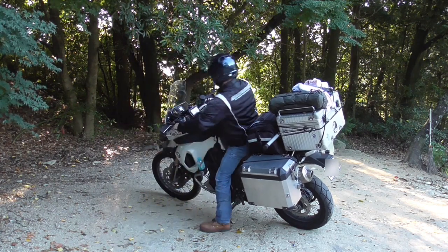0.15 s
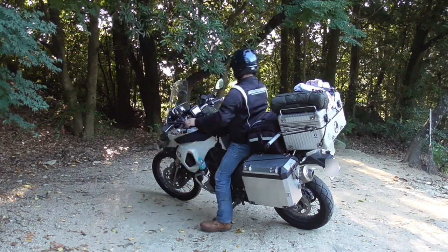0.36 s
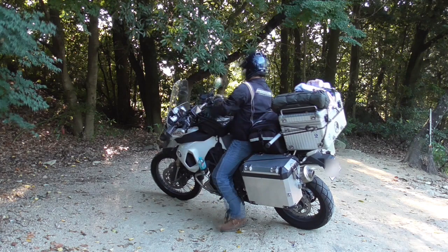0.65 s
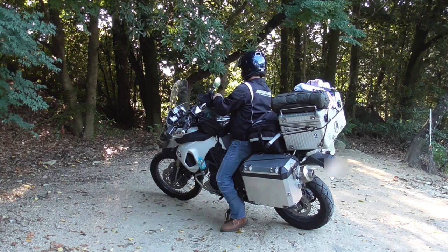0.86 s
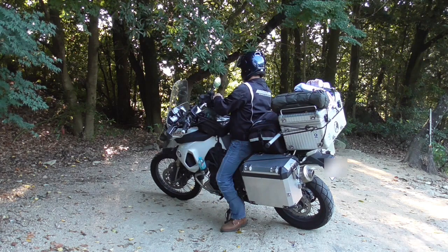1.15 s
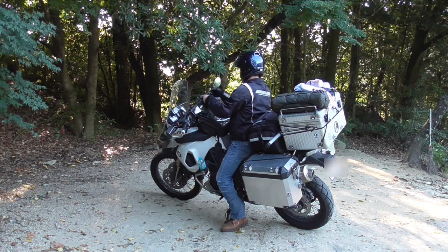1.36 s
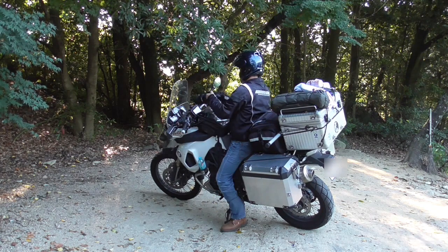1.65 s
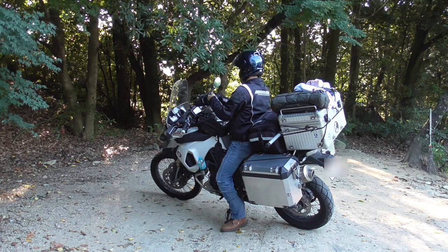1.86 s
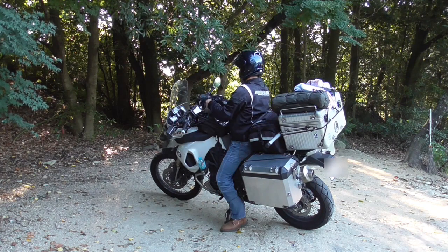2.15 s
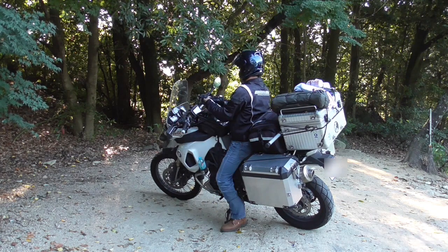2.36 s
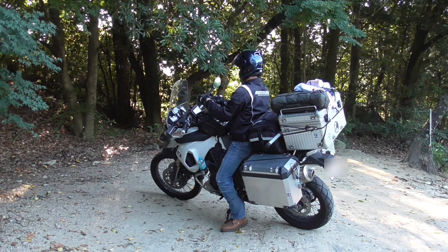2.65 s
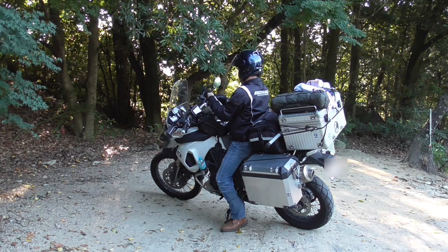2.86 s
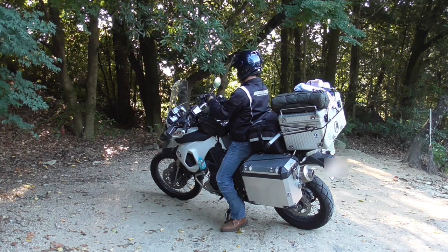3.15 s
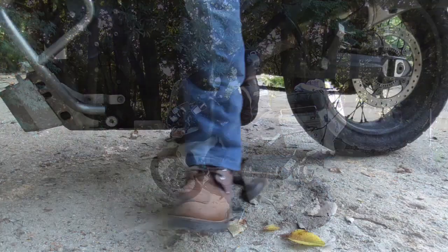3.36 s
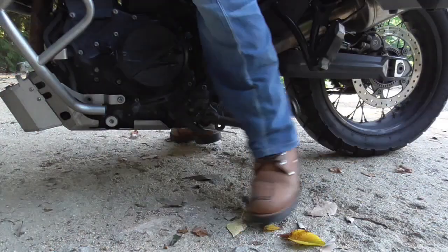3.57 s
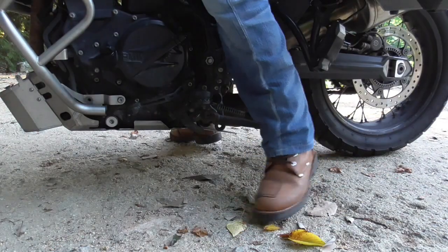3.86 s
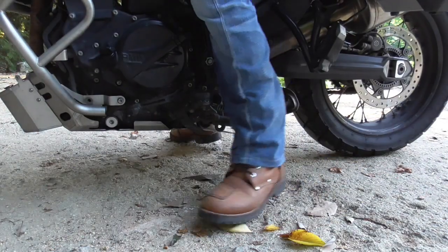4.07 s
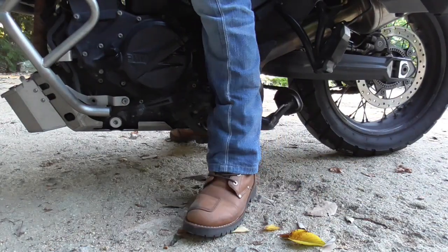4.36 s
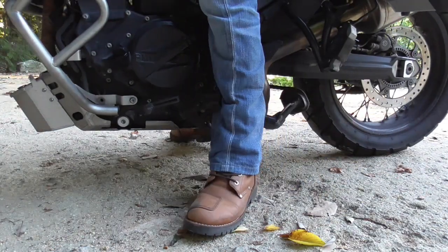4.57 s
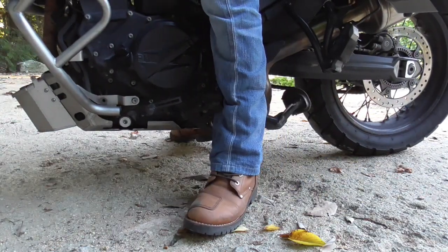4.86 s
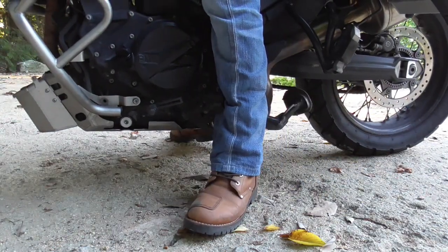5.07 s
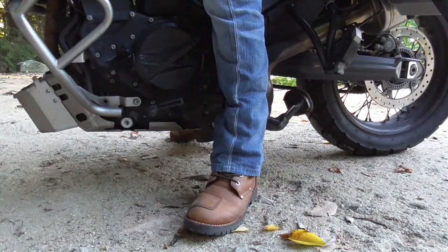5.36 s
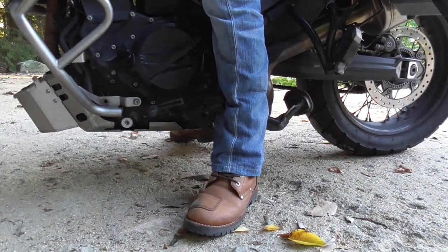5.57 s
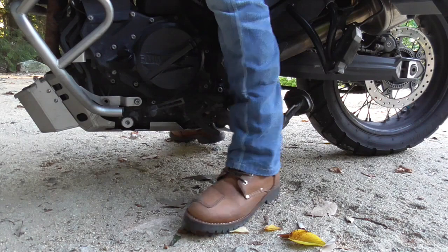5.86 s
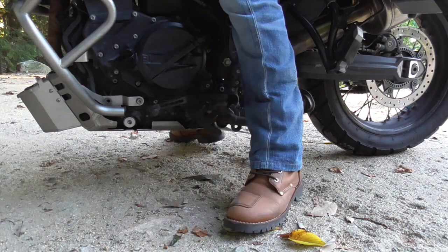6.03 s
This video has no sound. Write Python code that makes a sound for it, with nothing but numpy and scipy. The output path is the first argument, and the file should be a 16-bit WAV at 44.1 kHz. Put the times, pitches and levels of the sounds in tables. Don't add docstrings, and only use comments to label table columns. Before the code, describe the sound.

A wood outdoors, recorded in stereo near a motorcycle. From 0 s a dense, bright cicada chorus buzzes, throbbing almost five times a second, dipping briefly around 0.4 s; a soft boot shuffle, small close chirps and tiny dry rustles sit over faint leaves and distant traffic. At 3.07 s the sound drops out for an instant, then a scrape and crackle lead to a hard metal knock at 3.29 s, a second at 3.35 s, with a dull thud, rattle and thin spring ring. Cicadas swell back; a gritty scuff runs 3.8-4.1 s. At 4.56 s the starter clunks and grinds, its gear whine rising and sagging over three compressions, with low puffs. At 5.04 s the twin engine catches: uneven, dry, thumping barks with metallic chain clatter and short tree echoes, cicadas ducked beneath. From 5.6 s it revs faster, slackens near 5.85 s, then flares again around 6 s until the end.

```python
import sys
import numpy as np
from scipy import signal
from scipy.fft import rfft, irfft, next_fast_len
from scipy.io import wavfile

SR = 44100
rng = np.random.default_rng(int(sys.argv[2]) if len(sys.argv) > 2 else 0)


def voltage_ratio(level):
    return 10 ** (np.asarray(level, float) / 20)


def file_out(sig):
    cols = np.atleast_2d(sig).T
    lim = np.clip(cols, -1, 1)
    pcm = np.round(lim * 32767).astype(np.int16)
    wavfile.write(sys.argv[1], SR, pcm)


N = 273420

# (first firing [s], firings [count], first gap [ms], last gap [ms])
FIRING_RUNS = [
    (5.0436, 4, 37.6, 30.1),
    (5.1757, 12, 34.7, 35.5),
    (5.6219, 5, 28.4, 19.4),
    (5.7464, 4, 19.6, 21.2),
    (5.8259, 3, 22.1, 30.9),
    (5.9059, 3, 25.8, 28.5),
    (5.9907, 3, 26.3, 23.9),
    (6.0613, 4, 19.0, 18.5),
    (6.1382, 3, 26.1, 20.1),
]
# (time [s], bark [dB], thump [dB])
ENGINE_LOAD = [(5.045, -20.5, -16.5), (5.082, -9.5, -9), (5.16, -8.5, -12), (5.3, -11, -11.5),
               (5.375, -4.5, -8), (5.44, -9.5, -14), (5.49, -7, -3.5), (5.54, -12.5, -20.5),
               (5.665, -5, -19.5), (5.72, -15, -18), (5.765, -26, -20), (5.81, -22, -19.5),
               (5.88, -33, -25), (5.96, -17, -26), (5.99, -4, -7.5), (6.062, -13.5, -17),
               (6.118, -14.5, -19.5), (6.17, -29, -16)]
# (time [s], bark change [dB], thump change [dB], echo change
# [dB])
UNEVEN_FIRINGS = [(5.044, 6.5, 2.5, -7), (5.115, -4, -17, -12), (5.145, -1.5, 0, -8), (5.21, -6, -8, 12),
                  (5.245, 2, 0, -0.5), (5.315, 0.5, -1, -1), (5.35, -0.5, 0.5, 7), (5.42, -3, 1, 8),
                  (5.456, 1, -2, -6), (5.491, 0, -4.5, -7), (5.526, 0.5, 1, -1), (5.562, -0.5, 10.5, -8),
                  (5.622, 1, 8.5, -1), (5.65, 1, 5, -15), (5.676, 3.5, -7, -2), (5.698, -3, 7.5, 14),
                  (5.719, 4.5, 2, -18), (5.746, -3, -3, -15), (5.766, -1.5, -11, 12), (5.786, -1, 9, -14),
                  (5.808, -4, 5, 3), (5.826, 18, 15, -5), (5.849, 14, -13, -3.5), (5.879, -5, 4, 0),
                  (5.906, 0, 6, -17), (5.932, 2, 11, -6), (5.961, -8, 2, -9), (6.017, 3.5, -2, 0),
                  (6.041, 3, 4, -12), (6.062, 8, 7, -13), (6.08, 8.5, 2, -16), (6.099, 1.5, 2, -12),
                  (6.118, 10, 2, 5), (6.138, -7, -3, -7), (6.164, -7, 3, 1), (6.184, 9, 3, 2)]
# (time [s], delay [ms])
LATE_FIRINGS = [(5.044, 0.87), (5.115, 0.64), (5.176, 1), (5.315, 0.43), (5.456, 0.29), (5.526, 0.33),
                (5.622, 0.54), (5.65, 0.94), (5.826, .2), (5.786, -1.8), (5.719, 0.83), (5.961, -0.46),
                (6.062, .4)]
# (time [s], bark [dB], thump [dB], echo [dB])
EXTRA_POPS = [(5.0583, -10, -19, -1.5), (5.0932, -12, -19, 6), (5.1256, -8.5, -13, 5), (5.2398, -15, -15, -9),
              (5.298, -18, -24, 3), (5.366, -16, -31, -2), (5.438, -17, -26, 1), (5.5999, -16, -25, 11),
              (5.7272, -11, -24, 4), (5.7314, -12, -30, -9), (5.7745, -16, -22, 8), (5.838, -18, -30, 12),
              (5.897, -36, -18, -9), (5.941, -33, -16, -9), (5.9508, -23.5, -32, 24), (5.971, -8, -26, -5)]
# (time [s], pitch ratio [1])
COOLING_PITCH = [(5.73, 0.93), (5.79, 0.76), (5.83, 0.89), (5.9, 0.82), (5.96, 0.87), (6.13, 0.96),
                 (6.19, 0.73)]
# (pitch [Hz], level [dB], time to die by 60 dB [s])
SILENCER_MODES = [(426.4, -24.5, 0.34), (480, -31, 0.061), (706, -16, 0.087), (985, -31, 0.026)]
# (pitch [Hz], level [dB], time to die by 60 dB [s])
THUMP_MODES = [(118, -2, 0.074), (168, 3, 0.068)]
# (pitch [Hz], width [Hz], level [dB])
PIPE_FLOW = [(123, 100, -38), (408, 57, -38)]
# (time [s], rise [s], hold [s], fall [s], level [dB])
REV_FLARES = [
    (5.074, 0.022, .002, 0.025, 5),
    (5.64, 0.036, 0.13, 0.016, 4),
    (5.91, 0.053, 0.06, 0.017, 2),
    (5.996, 0.0046, 0.017, 0.2, 5.5),
    (6.134, .008, 0.016, 0.054, 4),
]
# (pitch [Hz], level [dB per Hz])
CHAIN_COLOUR = [(350, -3), (600, -4.5), (651, -2), (706, -5), (953, -5.5), (2240, -15), (3520, -9.5),
                (4490, -16), (7430, -20), (10300, -15.5), (15500, -26.5)]
# (time [s], level [dB])
STARTER_GRIND = [(4.54, -60), (4.562, -36), (4.605, -29), (4.64, -36), (4.7, -47), (4.722, -51),
                 (4.76, -41), (4.786, -38.5), (4.836, -39.5), (4.851, -40), (4.875, -39), (4.9, -45),
                 (4.966, -41), (4.978, -40), (5.01, -46), (5.03, -58)]
# (pitch [Hz], level [dB per Hz])
STARTER_COLOUR = [(120, -8), (250, 3.5), (500, -0.5), (900, 6.5), (1600, -1.5), (3500, 2.5), (8000, -7),
                  (15000, -15)]
# (time [s], tooth rate [Hz], first order [dB], second order [dB], upper orders [dB])
GEAR_WHINE = [
    [(4.6, 699, -43, -33, -56), (4.618, 786, -54, -33, -52), (4.64, 1040, -35, -34, -45),
     (4.668, 1153, -32.5, -40, -39), (4.686, 1134, -28.5, -32, -38.5), (4.7, 1083, -30, -28, -39),
     (4.718, 841, -36, -45, -39), (4.742, 654, -32.5, -36, -46), (4.755, 616, -50, -48, -60)],
    [(4.84, 1222, -49, -52, -54), (4.856, 1278, -24.5, -37, -46), (4.868, 1197, -38, -40, -41),
     (4.885, 1110, -48, -50, -47)],
    [(4.968, 1496, -46, -59, -59), (4.982, 1460, -26, -36, -42), (4.995, 1250, -36, -33, -59),
     (5.01, 1132, -25, -40, -36.5), (5.022, 1120, -44, -47, -56)],
]
# (multiple [1], level [dB])
GEAR_ORDERS = [(2, 1.2), (3, -1), (4, 4), (5, -2), (6, 2), (7, -15), (8, -1), (9, -3)]
# (time [s], peak [dB], pitch [Hz], crack [dB])
STARTER_CLUNKS = [
    (4.561, -21.5, 1030, -41),
    (4.603, -11.5, 1480, -16),
    (4.719, -10.5, 1550, -38),
    (4.845, -12, 1276, -10),
    (4.849, -21, 1150, -17),
    (4.867, -18, 1250, -23),
    (4.934, -28, 985, -19),
    (4.974, -12, 1510, -9.5),
    (5.005, -25, 1130, -21),
    (5.097, -34, 1400, -33),
]
# (time [s], peak [dB], pitch [Hz])
COMPRESSION_PUFFS = [
    (4.598, -55, 137),
    (4.799, -33.5, 72.7),
    (4.928, -34, 70.5),
    (4.948, -47, 99.6),
]
# (time [s], peak [dB], crack [dB], crack time to die [s], damping [0-1])
STAND_KNOCKS = [
    (3.287, -11, -9.5, 0.013, 0.8),
    (3.292, -14, -19, 0.031, 0.17),
    (3.348, -23, -26, 0.041, 0.4),
    (3.354, -15.5, -19, 0.038, 0.5),
]
# (pitch [Hz], level [dB], time to die by 60 dB [s])
FRAME_MODES = [(192, -26, .15), (229, -15, 0.14), (270, -14, 0.41), (313, -16, 0.09), (438, 1.5, 0.06),
               (613, -2, 0.015), (840, -11, 0.045), (917, 3.5, 0.045), (1120, -3, 0.072), (1227, -4, 0.077),
               (1305, -9.5, 0.055), (1040, 3, .04), (530, -7, 0.043), (700, -9, .04)]
# (pitch [Hz], peak [dB], time to die by 60 dB [s])
SPRING_MODES = [(345, -44, 2.2), (355, -52, 1.2), (720, -53, 1.3), (725.5, -58, 1.1)]
# (pitch [Hz], level [dB], time to die by 60 dB [s])
SHAKE_MODES = [(206, -7, 0.11), (274, 2, 0.05), (344, -1, 0.05), (476, 0.5, 0.017), (710, 1, 0.026),
               (890, -8, 0.017), (1150, -9, 0.02)]
# (time [s], peak [dB], pitch [Hz], time to die by 60 dB [s])
TYRE_THUDS = [
    (3.293, -21.5, 192, 0.16),
    (3.3567, -17.5, 206, 0.09),
    (3.376, -38, 207, 0.42),
    (3.42, -34, 255, 0.24),
    (3.468, -35.5, 340, 0.18),
]
# (time [s], length [s], level [dB], bright share [1])
BOOT_SCUFFS = [
    (0.04, 0.34, -50.5, .1),
    (3.159, 0.09, -49.5, 2.2),
    (3.25, 0.049, -48, 2.9),
    (3.818, 0.32, -50, 0.9),
    (4.36, 0.1, -53.5, 0.2),
]
# (time [s], length [s], lowest pitch [Hz], level [dB])
LEAF_RUSTLES = [(1.07, 0.054, 11000, -56), (1.3, .03, 11000, -51), (3.1, .17, 10500, -48),
                (3.199, 0.013, 4000, -29.5), (3.76, 0.15, 10500, -53), (3.911, .014, 10000, -42),
                (3.96, 0.089, 14300, -59)]
# (time [s], length [s], pitch [Hz], level [dB])
INSECT_CHIRPS = [(0.016, 0.043, 8330, -26.5), (0.034, 0.083, 4770, -40), (0.203, .13, 4800, -36),
                 (0.197, 0.19, 8650, -31.5), (.41, 0.06, 4850, -36), (1.153, .06, 4530, -33),
                 (2.47, 0.059, 3270, -36.5), (3.47, 0.033, 3380, -43), (3.558, .07, 4900, -32.5),
                 (3.777, .08, 4840, -35), (3.93, .05, 4800, -37), (4.01, 0.054, 4870, -37),
                 (4.18, .09, 5000, -35), (4.385, 0.075, 4900, -32), (4.4, .08, 8600, -33)]
# (pitch [Hz], level [dB per Hz])
INSECT_COLOUR = [(880, -62), (1500, -27.5), (1820, -28.5), (2150, -11), (2860, -8.5), (3340, -2),
                 (3610, -4.5), (4350, -0.5), (4990, 0.5), (5830, -8.5), (7820, 0), (9230, 0), (9790, -3),
                 (14200, -28.5), (15500, -38)]
# (pitch [Hz], side minus mid [dB])
INSECT_WIDTH = [(60, -6), (110, -8), (200, -7), (380, -6), (700, -5), (1290, -18), (2380, -4), (4400, -8),
                (8120, 1), (15000, -0.5)]
# (time [s], effort [dB], depth of the lead singer's throb [dB])
CHORUS_SONG = [(0, -31, -1.5), (.3, -33, 0), (.375, -37.5, -1), (.44, -31, 0), (.8, -31.5, -0.5),
               (1.2, -31.5, -1), (1.6, -31.5, -0.5), (2.1, -32.5, 2.5), (2.5, -33, 2.5), (2.92, -32, 1),
               (3.0, -34.5, -3), (3.25, -32.5, -3), (3.7, -30.5, -2), (4.1, -30, 1), (4.15, -36, -5),
               (4.22, -31, -1), (4.45, -30.5, 0), (6.2, -29.5, -2.5)]
# (time of a throb crest [s], throb rate [per s], end [s])
SONG_PHRASES = [
    (0.04, 4.6, .38),
    (0.89, 4.765, 3.3),
    (3.82, 4.9, 6.3),
]
# (time [s], level [dB])
LEAD_NEARNESS = [(.33, 1), (.42, 0.5), (1.6, 0.5), (1.9, -0.5), (2.7, -3.5), (3.0, 2.5)]
# (time [s], share [0-1])
SECOND_SHARE = [(.45, 0), (.55, .6), (1.1, .7), (1.4, 1), (2.95, 1), (3.05, 0)]
THROB_LAGS = [.105, .02, .016, 0]
BAND_DUCK_SHARES = [1, 1.16, 1.25, 0.6]
LATER_TILT = [-3, -3, -3, -4, -2.9, -2.5, -2.5, 1, -1.5, -4, -2]
# (time [s], depth [dB], hold [s])
GAIN_DIPS = [
    (3.301, 16, 0.0034),
    (3.364, 4, 0.11),
    (4.572, 1, .1),
    (4.67, 5.5, 0.12),
    (4.86, 7.5, 0.033),
    (4.999, 7, 2),
]
# (pitch [Hz], level [dB per Hz])
WOOD_TONE = [(12, -49), (20, -6), (125, 3), (158, -2.5), (279, 2), (340, -3.5), (544, -4.5), (1080, -11),
             (1700, -11), (2200, -10), (2860, -39), (4840, -120)]
# (pitch [Hz], side minus mid [dB])
WOOD_WIDTH = [(60, -4), (110, -9), (200, -8.5), (380, -5.5), (700, -5), (1290, -4), (2380, 1), (4400, -7),
              (8120, 0), (15000, -1)]
# (time [s], rise [s], hold [s], fall [s], level [dB])
TRAFFIC_SWELLS = [
    (2.98, 0.15, 0.22, .1, 22.5),
    (3.6, 0.059, 0.21, 1, 23),
]
# (delay [s], left [dB], right [dB])
TREE_ECHOES = [(.013, -20.5, -52), (0.028, -15.5, -15.5), (.047, -20.5, -17), (.071, -23, -51)]


def exhaust():
    out, pulses = np.zeros(N), np.zeros(N)
    size, lead_s = 6000, 0.008
    throttle_opens_s, pipe_echo_s = 5.61, 0.00964
    tail = ring_modes(soft_click(0.0013, size), SILENCER_MODES)
    barks = firings()
    warmth = 1 + 0.012 * rng.standard_normal((len(barks), 3))
    for (s, bark_db, thump_db, echo_db, long_pipe), (blast_tune, echo_tune, thump_tune) in zip(barks, warmth):
        if s > throttle_opens_s:
            blast_hz, blast_t60, thump_lag_s, chambers = 480, 0.0095, 0.0005, 2
        elif long_pipe:
            blast_hz, blast_t60, thump_lag_s, chambers = 445, 0.012, 0.0009, 3
        else:
            blast_hz, blast_t60, thump_lag_s, chambers = 495, 0.014, 0.0017, 2
        blast = -wavelet(blast_tune * blast_hz, blast_t60, size, chambers) - tail
        blast = peak_at(blast, lead_s)
        echo = peak_at(wavelet(echo_tune * 407, 0.027, size), lead_s + pipe_echo_s)
        pitch = thump_tune * np.interp(s, *np.transpose(COOLING_PITCH))
        thump = ring_modes(soft_click(0.0051, size), THUMP_MODES, pitch)
        thump = peak_at(thump, lead_s + thump_lag_s)
        bark = voltage_ratio(bark_db - 4) * (blast + voltage_ratio(echo_db - 10) * echo)
        add(out, bark + voltage_ratio(thump_db - 6) * thump, s - lead_s)
        add(pulses, voltage_ratio(bark_db + 10) * voltage_ratio(-60 * np.arange(size) / SR / 0.074), s - 0.001)
    running, = in_time([(5.015, 0), (5.04, 1)])
    flow = np.zeros(N)
    for hz, width_hz, db in PIPE_FLOW:
        flow += voltage_ratio(db) * rms_one(ring(rng.standard_normal(N), hz, 2 / width_hz))
    gas = signal.lfilter(*signal.iirnotch(280, 4, SR), out + running * flow)
    return high_pass(gas, 55), pulses


def firings():
    runs = []
    for start, count, first_ms, last_ms in FIRING_RUNS:
        gaps_ms = np.linspace(first_ms, last_ms, count - 1)
        runs.append(start + np.cumsum(np.r_[0, gaps_ms]) / 1000)
    s = np.concatenate(runs)
    long_pipe = np.arange(len(s)) % 2 == 0
    load_s, *load = np.transpose(ENGINE_LOAD)
    bark_db, thump_db = [np.interp(s, load_s, db) for db in load]
    echo_db = np.where(long_pipe, 6, -5.5) - 0.31 * (bark_db + 10)
    rows = np.c_[s, bark_db, thump_db, echo_db]
    for when, *change_db in UNEVEN_FIRINGS:
        rows[np.argmin(np.abs(s - when)), 1:] += change_db
    for when, late_ms in LATE_FIRINGS:
        rows[np.argmin(np.abs(s - when)), 0] += late_ms / 1000
    return np.c_[np.r_[rows, EXTRA_POPS], np.r_[long_pipe, np.ones(len(EXTRA_POPS))]]


def wavelet(hz, t60, size, chambers=2):
    wave = soft_click(0.0002, size)
    for _ in range(chambers):
        wave = ring(wave, hz, t60)
    return wave / np.abs(wave).max()


def peak_at(sound, lag_s):
    return np.roll(sound, int(lag_s * SR) - np.argmax(sound))


def clatter(pulses):
    silent_before = [(STARTER_GRIND[0][0] - 0.01, -90)]
    silent_after = [(STARTER_GRIND[-1][0] + 0.011, -90)]
    grind_db, = in_time(silent_before + list(STARTER_GRIND) + silent_after)
    start_db, = in_time([(5.02, -60), (5.03, 0)])
    running_db = -38 + start_db + swells(REV_FLARES)
    running = metal_noise(running_db, CHAIN_COLOUR, 1.086 + 0.5 * pulses)
    return pan(metal_noise(grind_db, STARTER_COLOUR, 1), 3) + pan(running, 0.91)


def metal_noise(level_db, colour, gate):
    edges_hz = [100, 900, 2000, 4000, 8000, 17000]
    width = [(200, -12), (2000, -10), (9000, -4.5)]   # (pitch [Hz], side minus mid [dB])
    bands = coloured(grains(0.46, 7000), colour, width, edges_hz, patchy_db=2.5, patch_rate=40)
    unit = np.sqrt(np.mean(bands[1].mean(axis=0) ** 2))
    return voltage_ratio(level_db - 3.5) * gate * sum(bands) / unit


def starter():
    out = np.zeros(N)
    for rows in GEAR_WHINE:
        s, hz, first_db, second_db, upper_db = np.transpose(rows)
        t = np.arange(s[0], s[-1], 1 / SR)
        size = len(t)
        tooth_hz = np.interp(t, s, hz) * (1 + 0.016 * drift(200)[:size])
        turn = 2 * np.pi * np.cumsum(tooth_hz) / SR
        first = voltage_ratio(3.2 * drift(150)[:size]) * np.sin(turn)
        second, *upper = [voltage_ratio(order_db + 4.8 * drift(130)[:size]) * np.sin(order * turn)
                          for order, order_db in GEAR_ORDERS]
        teeth = voltage_ratio(np.interp(t, s, first_db)) * first
        teeth += voltage_ratio(np.interp(t, s, second_db)) * second
        teeth += voltage_ratio(np.interp(t, s, upper_db)) * sum(upper)
        add(out, 1.17 * signal.windows.tukey(size, 0.12) * teeth, s[0])
    for s, peak_db, hz, crack_db in STARTER_CLUNKS:
        burst = dying_noise(0.049, 0.0024, 4000)
        casing = ring(burst, hz, 0.024)
        casing += 0.43 * ring(burst, hz * 0.8, 0.022) + 0.21 * ring(burst, hz * 1.67, 0.018)
        crack = voltage_ratio(crack_db - 2.5) * band_pass(burst, 2, 2500, 9500)
        add(out, voltage_ratio(peak_db - 7) * casing / np.abs(casing).max() + crack, s)
    for s, peak_db, hz in COMPRESSION_PUFFS:
        add(out, voltage_ratio(peak_db + 2.5) * ring(soft_click(0.0059, 8000), hz, 0.12), s)
    return out


def side_stand():
    out, size = np.zeros(N), 30000
    for s, peak_db, crack_db, crack_t60, damping in STAND_KNOCKS:
        rattle = dying_noise(0.037, 0.00069, size) / 12
        body = sum(voltage_ratio(db) * ring(rattle, hz, t60 * (1.4 - damping)) for hz, db, t60 in FRAME_MODES)
        burst = dying_noise(crack_t60, 0.00043, size)
        crack = 0.93 * band_pass(burst, 2, 2400, 5500 + 11000 * damping ** 2)
        crack += voltage_ratio(-15) * ring(burst, 4750, 0.003)
        add(out, voltage_ratio(peak_db - 13.5) * body + voltage_ratio(crack_db) * crack, s)
    for s, peak_db, hz, t60 in TYRE_THUDS:
        add(out, voltage_ratio(peak_db) * ring(soft_click(0.0014, size), hz, t60), s)
    add(out, ring_modes(soft_click(0.0003, size), SPRING_MODES), 3.355)
    shake = dying_noise(0.46, 0.03, size) / 12
    add(out, voltage_ratio(-33) * ring_modes(shake, SHAKE_MODES), 3.365)
    out = high_pass(out, 110)
    add(out, voltage_ratio(-42) * ring(soft_click(0.008, size), 38, 0.25), 3.29)
    return out


def scuffs():
    grit, out = rms_one(grains(0.71, 3000)[0]), np.zeros(N)
    dull = rms_one(band_pass(grit, 1, 120, 900))
    for s, length, db, bright in BOOT_SCUFFS:
        at, size = int(s * SR), int(length * SR)
        out[at:at + size] += voltage_ratio(db) * np.hanning(size) * (dull + bright * grit)[at:at + size]
    return out


def rustles():
    grit, out = grains(1.5, 9000), np.zeros((2, N))
    for s, length, low_hz, db in LEAF_RUSTLES:
        at, size = int(s * SR), int(length * SR)
        high_hz = max(1.32 * low_hz, 9000) if low_hz < 12000 else 15000
        mid, side = rms_one(band_pass(grit[:, at:at + size], 3, low_hz, high_hz))
        out[:, at:at + size] += voltage_ratio(db + 5.5) * np.hanning(size) * (mid + 0.6 * side * [[1], [-1]])
    return out


def chirps():
    clicks, out = grains(0.5, 9000), np.zeros((2, N))
    for s, length, hz, db in INSECT_CHIRPS:
        at, size = int(s * SR), int(length * SR)
        belly = ring(clicks[:, at:at + size], hz, 20 / hz)
        mid, side = rms_one(ring(belly, hz, 20 / hz))
        out[:, at:at + size] += voltage_ratio(db + 2) * np.hanning(size) * (mid + hz / 9000 * side * [[1], [-1]])
    return out


def cicadas():
    edges_hz = [1500, 2500, 3300, 4000, 4600, 5200, 6200, 7500, 8800, 10000, 12000, 17000]
    bands = coloured(grains(0.34, 16000), INSECT_COLOUR, INSECT_WIDTH, edges_hz, patchy_db=1.4, patch_rate=24)
    near, = in_time([(3.3, 0), (3.4, 1)])
    bands = [band * voltage_ratio(near * db) for band, db in zip(bands, LATER_TILT)]
    second_share, = in_time(SECOND_SHARE)
    turn = 2 * np.pi * 5 * (np.arange(N) / SR - 0.765)
    second_db = second_share * 3 * (np.cos(turn) - 0.45 * np.cos(2 * turn))
    sweep_db = second_share * np.sin(turn)
    bands[3] = voltage_ratio(-sweep_db) * bands[3]
    bands[4] = voltage_ratio(sweep_db) * bands[4]
    effort_db, throb_db = in_time(CHORUS_SONG)
    flank, belly = (-7.5, 0.41, 0.5, 1), (-2.1, 0.18, 0.5, -0.22)
    tymbal, overtone = (0.28, 0.74, 0.035, 0.8), (-14, 1.5, 0.56, 3.5)
    flank_db, belly_db, tymbal_db, lead_db = [
        effort_db + song_level(throb_db, lag_s, *settings)
        for lag_s, settings in zip(THROB_LAGS, (flank, belly, tymbal, overtone))]
    lead_power = voltage_ratio(2 * (lead_db + in_time(LEAD_NEARNESS)[0]))
    far_power = voltage_ratio(2 * (effort_db - 19.5))
    overtone_db = 10 * np.log10(lead_power + far_power)
    groups = bands[:3], bands[3:6], bands[6:9], bands[9:]
    levels_db = flank_db, belly_db + second_db, tymbal_db, overtone_db
    duck_db = ducking()
    return sum(levelled(group, db + share * duck_db)
               for group, db, share in zip(groups, levels_db, BAND_DUCK_SHARES))


def song_level(throb_db, lag_s, level_db, share, sharp, steady_db):
    t = np.arange(N) / SR - lag_s
    inside = [t < end for _, _, end in SONG_PHRASES]
    turns = [(t - crest_s) * rate for crest_s, rate, _ in SONG_PHRASES]
    turn = 2 * np.pi * np.select(inside, turns)
    return level_db + (steady_db + share * throb_db) * (np.cos(turn) + sharp * np.cos(2 * turn))


def ducking():
    t = np.arange(N) / SR
    attack_s, release_s = 0.0068, 0.048
    dips = []
    for s, db, hold in GAIN_DIPS:
        fall = np.clip((t - s) / attack_s, 0, 1)
        recovery = np.exp(-np.maximum(t - s - attack_s - hold, 0) / release_s)
        dips.append(db * fall * recovery)
    return -np.max(dips, axis=0)


def wood():
    edges_hz = [15, 50, 120, 250, 500, 1000, 2300]
    noise = rng.standard_normal((2, N))
    bands = coloured(noise, WOOD_TONE, WOOD_WIDTH, edges_hz, patchy_db=1.5, patch_rate=11)
    swell_db = swells(TRAFFIC_SWELLS)
    drone_hz = 71 * (1 + 0.11 * drift(15.2))
    drone = np.sin(2 * np.pi * np.cumsum(drone_hz) / SR) * voltage_ratio(1.4 * drift(7.2))
    leaf_db = -56 + 0.17 * swell_db + 0.23 * ducking()
    return levelled(bands[:2], -68) + levelled(bands[2:], leaf_db) + voltage_ratio(-77.5 + swell_db) * drone


def trunks(x):
    dull = signal.lfilter([0.3], [1, -0.7], x)
    out = np.zeros((2, N))
    for s, left_db, right_db in TREE_ECHOES:
        out += np.pad(dull, (int(s * SR), 0))[:N] * voltage_ratio([[left_db], [right_db]])
    return out


def rms_one(x):
    return x / np.sqrt(np.mean(x ** 2) + 1e-20)


def in_time(rows):
    s, *columns = np.transpose(rows)
    return [np.interp(np.arange(N) / SR, s, column) for column in columns]


def at_hz(points, hz):
    table_hz, db = np.transpose(points)
    return np.interp(np.log(hz), np.log(table_hz), db)


def drift(rate):
    r = np.exp(-2 * np.pi * rate * 40 / SR)
    slow = signal.lfilter([1], [1, -2 * r, r * r], rng.standard_normal(N // 40 + 2002))[2000:]
    return np.interp(np.arange(N) / 40, np.arange(len(slow)), rms_one(slow))


def ring(clicks, hz, t60):
    r, w = voltage_ratio(-60 / (t60 * SR)), 2 * np.pi * hz / SR
    return signal.lfilter([0, np.sin(w)], [1, -2 * r * np.cos(w), r * r], clicks + 1e-18)


def ring_modes(push, modes, pitch=1):
    return sum(voltage_ratio(db) * ring(push, pitch * hz, t60) for hz, db, t60 in modes)


def soft_click(width_s, size):
    push = np.hanning(max(int(width_s * SR), 3) + 2)[1:-1]
    return np.pad(push / push.sum(), (0, size - len(push)))


def dying_noise(t60, rise_s, size):
    t = np.arange(size) / SR
    return rng.standard_normal(size) * voltage_ratio(-60 * t / t60) * np.minimum(t / rise_s, 1)


def grains(spread_db, per_s):
    born = rng.random((2, N)) < per_s / SR
    size_db = spread_db * np.minimum(rng.exponential(1, (2, N)), 4)
    return born * voltage_ratio(size_db) * rng.standard_normal((2, N))


def coloured(source, colour, side, edges_hz, patchy_db, patch_rate):
    size = next_fast_len(N)
    hz = np.maximum(np.arange(size // 2 + 1) * SR / size, 1)
    width = [np.ones_like(hz), voltage_ratio(at_hz(side, hz))]
    spectrum = rfft(source, size) * voltage_ratio(at_hz(colour, hz)) * width
    bands = []
    for low, high in zip(edges_hz, edges_hz[1:]):
        mid, sides = irfft(spectrum * ((hz >= low) & (hz < high)), size)[:, :N]
        bands.append(voltage_ratio(patchy_db * drift(patch_rate)) * (mid + sides * [[1], [-1]]))
    return bands


def levelled(bands, level_db):
    total = sum(bands)
    return voltage_ratio(level_db) * total / np.sqrt(np.mean(total.mean(axis=0) ** 2))


def swells(rows):
    t = np.arange(N) / SR
    curves = [np.interp(t, np.cumsum([s, rise, hold, fall]), [0, db, db, 0])
              for s, rise, hold, fall, db in rows]
    return np.max(curves, axis=0)


def band_pass(x, order, low_hz, high_hz):
    return signal.sosfilt(signal.butter(order, [low_hz, high_hz], "band", fs=SR, output="sos"), x)


def high_pass(x, hz):
    return signal.sosfilt(signal.butter(2, hz, "high", fs=SR, output="sos"), x)


def add(track, sound, s):
    at = int(s * SR)
    track[at:at + len(sound)] += sound[:N - at]


def pan(x, db):
    return x * voltage_ratio([[db / 2], [-db / 2]])


def scene():
    barks, pulses = exhaust()
    bass = signal.lfilter(*signal.butter(1, 200, fs=SR), barks)
    stand, whine = side_stand(), starter()
    engine = pan(barks - bass, -3.3) + pan(bass, -1.2) + clatter(pulses)
    machine = engine + pan(whine, 3) + pan(stand, 3)
    echoes = trunks(stand + whine + barks)
    return machine + echoes + scuffs() + rustles() + chirps() + cicadas() + wood()


def band_limit(x):
    return signal.sosfilt(signal.butter(12, 15700, fs=SR, output="sos"), x)


def record(dry):
    dropout_s, fade_in_s = 3.0735, 0.015
    fade, = in_time([(dropout_s - 0.0004, 1), (dropout_s, voltage_ratio(-16)), (dropout_s + fade_in_s, 1)])
    rounded = 1.334 * np.tanh(fade * dry / 1.08)
    mix = signal.sosfilt(signal.cheby2(12, 60, 15950, fs=SR, output="sos"), rounded)
    return band_limit(mix)


dry = scene()
out = record(dry)
file_out(out)
```